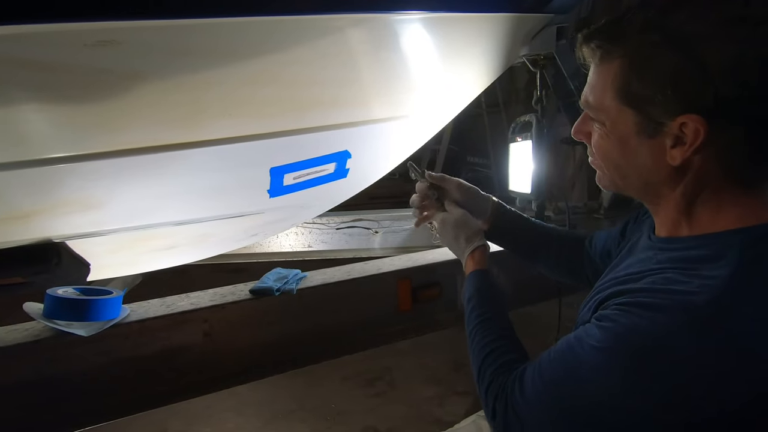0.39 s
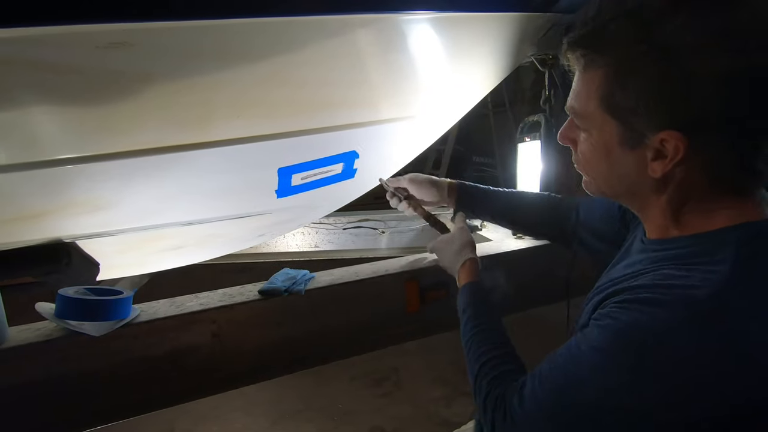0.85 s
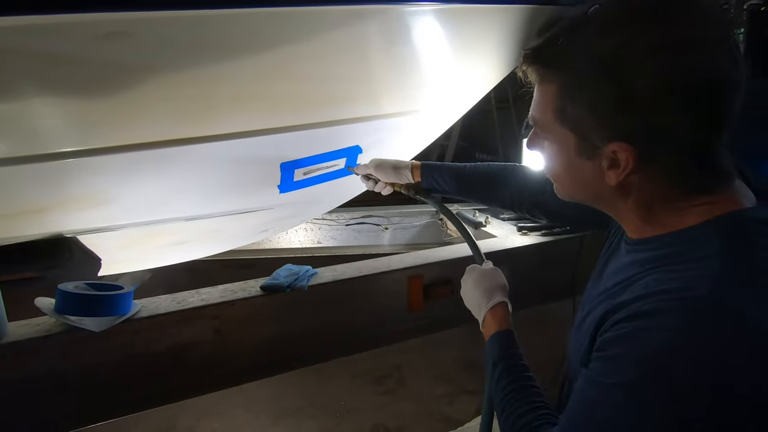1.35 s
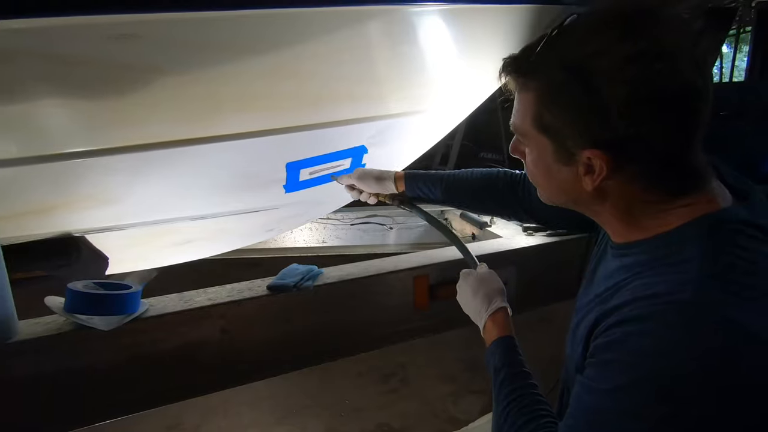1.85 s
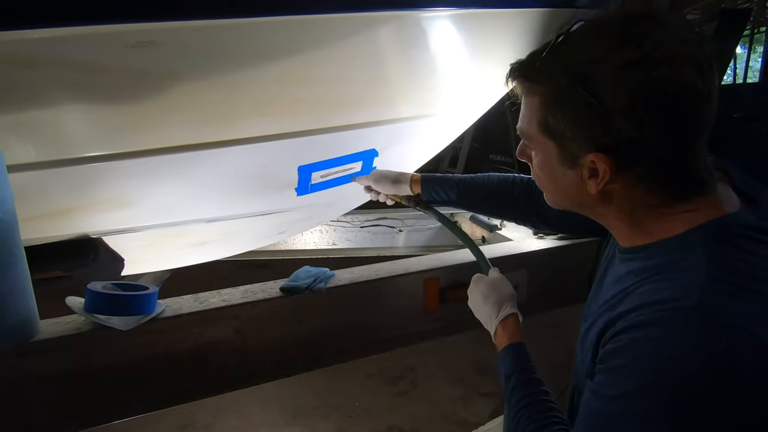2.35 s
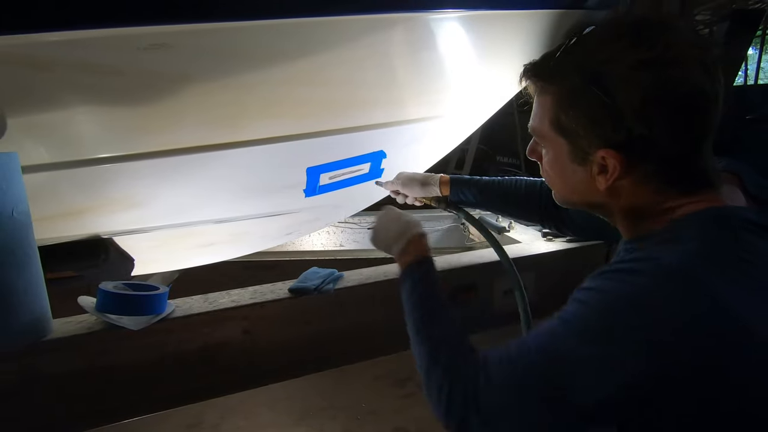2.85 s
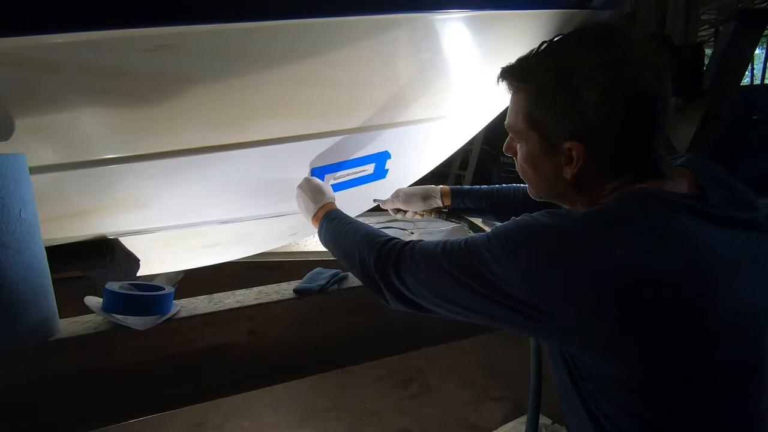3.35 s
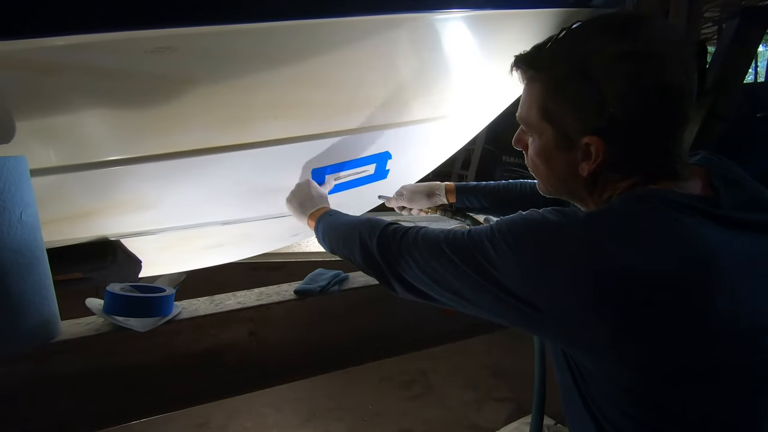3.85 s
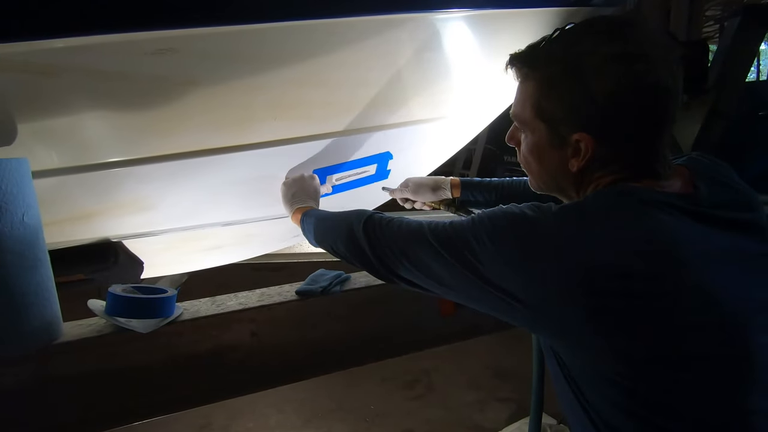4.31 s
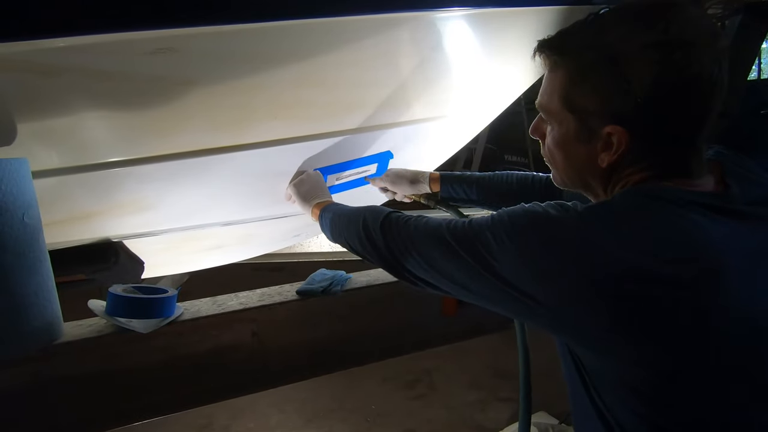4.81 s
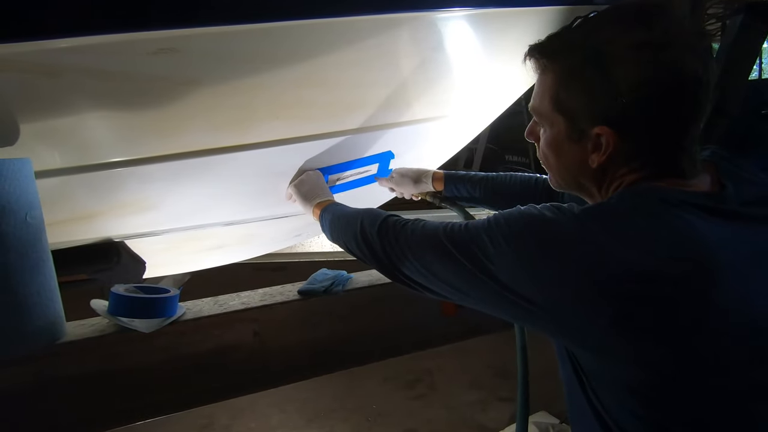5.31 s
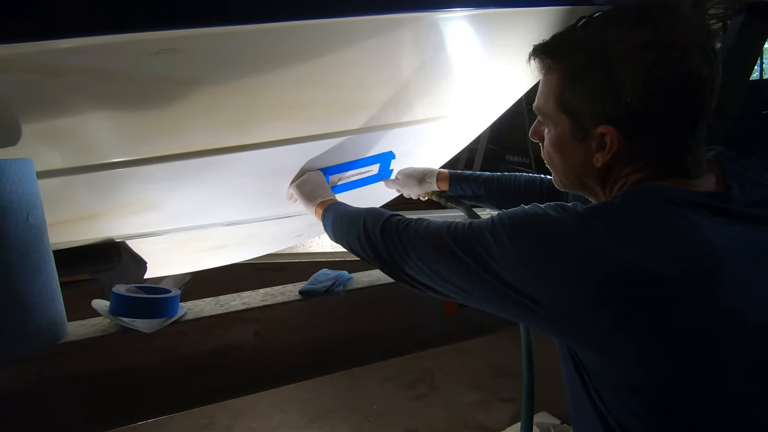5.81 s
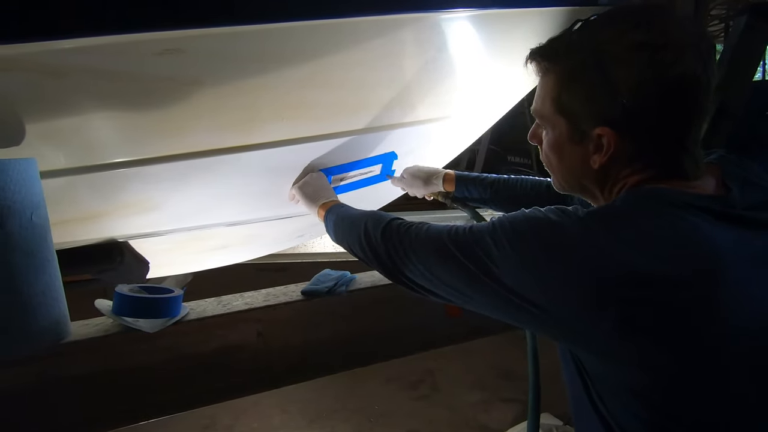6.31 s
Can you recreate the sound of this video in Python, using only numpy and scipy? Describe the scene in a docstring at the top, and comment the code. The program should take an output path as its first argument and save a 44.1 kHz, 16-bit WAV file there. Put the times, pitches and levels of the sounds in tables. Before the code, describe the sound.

A compressed-air blow gun blasts harsh hiss in short bursts, seeps thinly, then roars steadily across a boat hull with a hollow hum.

```python
"""An air blow gun in a shed, heard close by through the two ports of a small camera. The jet roars on the hand,
then the valve seeps after a faint spit, and trigger blasts sweep a taped hull patch, roaring lower at edges.
After a second stretch of seep, a long blast hums a hollow in the hull. Shaped noise makes the air, wavering
sines the hum, and single fast swings the valve thumps; a short noise tail and a gusty low wash hold the shed."""
import sys
import numpy as np
from scipy import signal
from scipy.io import wavfile
from scipy.ndimage import uniform_filter1d, map_coordinates

SR = 44100
rng = np.random.default_rng(int(sys.argv[2]) if len(sys.argv) > 2 else 0)


def file_out(sig):
    """Save sig as 16-bit WAV at sys.argv[1]."""
    # one column per channel
    cols = np.atleast_2d(sig).T
    # limit, then scale
    lim = np.clip(cols, -1, 1)
    pcm = np.round(lim * 32767).astype(np.int16)
    wavfile.write(sys.argv[1], SR, pcm)


def makeup_ratio(level_db):
    """Linear amplitude ratio for a level in decibels (20 dB per factor of ten)."""
    decades = np.asarray(level_db, float) / 20
    return 10 ** decades


N = 283253
T = np.arange(N) / SR
HZ, FRAME_S, _ = signal.stft(T, SR, nperseg=1024)

# trigger held, levels ahead of surge and sag: open_s, shut_s, hiss_db, low_roar_db, top_db
BLASTS = [(-.006, 0.028, -25, 11, -2), (.152, 0.45, -15.5, 3, -3.5), (1.185, 1.286, -12.5, -4, -1),
          (1.389, 1.491, -12.5, -3, -1), (1.56, 1.681, -14, -0.5, 0.5), (1.721, 3.044, -14.5, 0.5, 2.5),
          (4.646, 6.6, -14, -1.5, 0)]
OPEN_S, SHUT_S = 0.0085, 0.0088
# stored hose pressure rushes out first, then the supply sags
SURGE_DB, SURGE_S, SAG_DB_PER_S = 3.5, 0.018, 0.82
# air seeping past the valve: time_s, hiss_db, low_roar_db, top_db
SEEP = [(.68, -23, -2, -4.5), (.75, -31, 11, 2.5), (.88, -27.5, 5, 1.5), (1.0, -22.5, 0, 3),
        (1.17, -15.5, -10, -12), (1.3, -28, -2, 1.5), (3.15, -27, 2.5, 1.5), (3.32, -25.5, 1, 0.5),
        (3.5, -24, -1, 0.5), (4.0, -21, 5.5, 2), (4.63, -18, 6.5, 1)]
SEEP_START_S, SPIT_S = .675, .663
SEEP_UNDER_JET_DB = -4  # the open valve swallows part of the seep
# when the jet leaves the hand for the hull, and when the gun changes hands
HAND_UNTIL_S, NEW_GRIP_S = 1, 3.05
# jet colour against the hand: pitch_hz, density_db (per Hz)
JET_ON_HAND = [(120, -17), (200, -16.5), (392, -16), (479, -21.5), (923, -9), (2130, -9), (2330, -8),
               (3480, -1.5), (4840, -0.5), (9140, -1), (13600, -15), (15500, -24)]
# jet colour against the hull, before and after the new grip: pitch_hz, density_db (per Hz)
JET_ON_HULL = [
    [(120, -37), (200, -26.5), (506, -28), (858, -17.5), (1070, -16.5), (1540, -12.5), (1910, -10.5),
     (3480, 0), (4260, 0), (5300, -4.5), (8500, -6), (13900, -23), (15500, -27)],
    [(120, -47), (200, -13.5), (345, -29.5), (414, -25), (702, -19), (940, -13.5), (1130, -16.5),
     (1810, -18.5), (3610, 2), (5300, -4), (8660, -5), (13900, -23), (15500, -30)],
]
# seep colour before and after the new grip: pitch_hz, density_db (per Hz)
SEEP_COLOUR = [
    [(180, -52), (300, -25), (641, -21.5), (696, -17), (835, -14.5), (1810, -9), (2000, -9.5), (2320, -3),
     (3750, -2.5), (8990, -7), (15500, -30)],
    [(180, -57), (300, -24), (492, -27.5), (781, -21), (1400, -17.5), (1520, -13), (1730, -11.5),
     (2280, -3), (2880, -3), (3630, -2.5), (4210, -4), (8560, -11), (15500, -33.5)],
]
# the jet crosses an edge: time_s, half_length_s, roar_db, ring_hz
CROSSINGS = [(0.185, 0.051, 5, 1040), (0.39, 0.036, 1.5, 1510), (1.8, 0.022, 4, 1200),
             (1.98, 0.073, 4.5, 1500), (2.093, 0.022, 9.5, 1520), (2.258, 0.046, 10, 1570),
             (2.6, 0.056, 5, 1900), (2.776, 0.062, 7, 1480), (2.939, 0.06, 9, 1010), (4.8, 0.22, 0.5, 1700),
             (4.96, 0.053, 7.5, 940), (5.08, 0.052, 11, 950), (4.96, 0.024, 6, 1440),
             (5.117, 0.023, 5.5, 1600)]
# dB per dB of roar: level dip, lift of the top, ring; then ring width as a share of its pitch
CROSS_DIP, CROSS_TOP, CROSS_RING, RING_SHARE = 0.14, 0.18, 0.55, 0.1
# the jet squares up to the hull and the hiss swells (negative: eases): time_s, half_length_s, swell_db
SWELLS = [(1.27, .03, 1), (1.46, .03, -1.5), (1.876, .03, 7), (2.162, 0.02, 6.5), (2.373, .06, 2.5),
          (2.476, .015, 2), (5.062, 0.031, 6), (6.057, 0.078, 2.5)]
# resonances of the camera housing: pitch_hz, width_hz, lift_db
HOUSING = [(1010, 55, 0.5), (1560, 34, 6), (1760, 27, 1), (2350, 123, 5), (3500, 1030, 2.5), (4150, 200, 1),
           (4910, 19, 3.5), (5340, 100, 0.5), (6200, 66, 3.5), (8200, 410, 1), (10170, 1500, 1.5),
           (10950, 1020, -5)]
# ridges in the hiss while the nozzle holds a pose: start_s, end_s, from_hz, to_hz, width_hz, lift_db
RIDGES = [(.14, 0.446, 2950, 2820, 1210, 6.5), (0.154, .45, 6130, 5940, 200, 3.5),
          (0.655, 0.787, 3300, 3500, 400, 9), (.7, 0.857, 5900, 7300, 400, 5),
          (0.802, 1.044, 3730, 3650, 600, 7.5), (.7, .88, 2400, 2410, 300, 4),
          (0.862, 1.027, 3900, 5330, 450, 4.5), (1.055, 1.22, 2180, 2260, 250, 8),
          (1.547, 1.7, 4300, 4150, 300, 5), (2.337, 3.052, 4470, 4930, 500, 4),
          (3.103, 4.68, 1560, 1560, 121, 7.5), (3.254, 4.284, 2080, 2110, 302, 6.5),
          (3.1, 4.093, 4570, 4700, 350, 6), (3.3, 3.9, 6100, 6260, 200, 2),
          (3.102, 4.2, 7540, 7500, 1500, -2), (4.164, 4.643, 3660, 3500, 400, 5),
          (4.374, 4.657, 5900, 5930, 200, 13), (4.7, 6.5, 4300, 4760, 800, 2),
          (4.88, 5.13, 940, 940, 90, 4.5), (5.95, 6.5, 9900, 10000, 6000, 3.5)]
FLUTTER_DB = .6  # flutter of the whole jet
# tones of the hollow behind the patch: pitch_hz, waver_hz, level_db
HOLLOW = [(414, 16, 1), (598, 24, -3)]
# the jet sweeps over the mouth of the hollow: time_s, level_db
HUMS = [(.95, -44), (2.11, -44), (2.82, -41.5), (2.99, -36), (3.23, -42.5), (4.9, -41), (5.06, -38.5),
        (5.18, -34.5), (5.325, -30), (5.47, -35), (5.625, -33.5), (5.815, -32.5), (5.97, -34.5),
        (6.12, -39.5), (6.31, -39)]
HUM_RISE_S, HUM_FADE_DB_PER_S = 0.017, 164
# breathy lift of the jet's bass, in dB per dB of hum above the quiet level
HUM_PUFF_DB, HUM_PUFF_HZ, HUM_QUIET_DB = 0.72, 600, -47
# valve thumps, ahead of their decay and bass cut: time_s, level_db, swing_hz, first_swing (+1 up, -1 down)
THUMPS = [(.199, -12.5, 136, -1), (0.453, -18.5, 161, -1), (.682, -48, 160, 1), (1.285, -24.5, 210, -1),
          (1.384, -31, 109, 1), (1.487, -24.5, 207, -1), (1.561, -27, 110, 1), (1.679, -32.5, 171, -1),
          (4.654, -35, 100, 1)]
# tail of the shed
ROOM_T60_S, ROOM_DB, ROOM_DULL_HZ = 0.54, -10.5, 11200
# colour of the low air in the shed: pitch_hz, density_db (per Hz)
SHED = [(25, -4), (45, 4), (70, 2), (150, 0.5), (300, -6.5), (600, -14.5), (2000, -18), (8000, -11),
        (15000, -37)]
# gusts of stirred air: time_s, half_length_s, lift_db, deepest_part_db
GUSTS = [(.2, 0.043, 13, 5), (.3, 0.053, 12, 0), (1.29, .04, 5.5, 13), (1.68, 0.08, -8, 13),
         (2.0, .07, 1.5, 9), (2.11, 0.034, 6, 11), (2.58, 0.045, 4, 1), (2.95, .08, 5, 0),
         (3.7, 0.069, 6, 2), (3.92, 0.072, 0, 11), (4.15, .1, 3.5, -2), (4.66, .04, -0.5, 19),
         (4.74, .1, 6.5, -1), (5.1, 0.6, 6.5, -12), (5.86, .04, -1, 10), (6.39, 0.072, 10.5, -15)]
# wash at rest, its lift while the jet blows, and its deepest part
WASH_DB, WASH_LIFT_DB, DEEP_DB = -51, 3, -4
# width at the two ports: pitch_hz, side_minus_mid_db
PORT_SIDE = [(60, -12.5), (200, -15), (380, -13), (700, -8), (1290, -4), (1900, -5), (2400, -14),
             (3500, -17), (4400, -17), (5500, -3), (6800, -2.5), (8200, 0.5), (10000, -2), (15000, -1.5)]
# balance of the two ports: pitch_hz, left_minus_right_db
PORT_BALANCE = [(60, -0.5), (380, 0), (700, -1.5), (1290, -1.5), (2380, 1), (4400, .5), (6000, -0.5),
                (8120, -3), (11000, -2), (15000, 3.5)]
# part of the side a quarter turn from the mid: pitch_hz, share (signed, no unit)
PORT_LAG = [(300, -0.072), (690, -.4), (1030, .6), (1380, -0.61), (1720, .6), (2150, -.4), (2700, 0),
            (5900, .35), (8600, .45), (9700, -.2), (10500, .5), (12600, .05)]
MIC_LOW_HZ = 42


def on_hz(table):
    """A (pitch_hz, value) table read on a log pitch axis at every bin."""
    hz, value = np.transpose(table)
    return np.interp(np.log(HZ + 1), np.log(hz), value)[:, None]


def bumps(table):
    """Bell-shaped resonances over pitch, in dB."""
    return sum(db / (1 + (2 * (HZ - hz) / width) ** 2) for hz, width, db in table)[:, None]


def bells(t, s, half_s, db):
    """Sum of smooth rises and falls in time, in dB."""
    return sum(g * np.exp(-((t - at) / half) ** 2) for at, half, g in zip(s, half_s, db))


def eddies(rate, count, even=False):
    """Turbulence: random levels, rate a second, smooth over time and count patches of log or even pitch."""
    grid = rng.standard_normal((count + 2, int(N / SR * 40) + 3))
    place = HZ / HZ[-1] if even else np.log(HZ / 100 + 1) / np.log(SR / 200)
    f, t = np.meshgrid(count * place, FRAME_S * min(rate, 40), indexing="ij")
    return map_coordinates(grid, [f, t], order=1) * 1.4  # makes up for spread lost in smoothing


def hiss(db, lo_hz, hi_hz):
    """Air noise at two ports, shaped by db over pitch and time, its mid levelled between lo_hz and hi_hz."""
    mid, other = (signal.stft(rng.standard_normal(N), SR, nperseg=1024)[2] for _ in range(2))
    band = (HZ > lo_hz) & (HZ < hi_hz)
    band_power = np.sum(makeup_ratio(db[band]) ** 2, axis=0).mean() / len(HZ)
    gain = makeup_ratio(db) / np.sqrt(band_power)
    share = makeup_ratio(on_hz(PORT_SIDE))
    # the part of the side that moves with the mid makes one port louder
    balance = np.tanh(on_hz(PORT_BALANCE) * np.log(10) / 20)
    lean = np.clip(balance * (1 + share ** 2) / (2 * share), -.75, .75)
    # the part a quarter turn away comes from the gap between the ports
    lag = np.clip(on_hz(PORT_LAG), -.65, .65)
    loose = np.sqrt(1 - lean ** 2 - lag ** 2) * other
    side = share * ((lean + 1j * lag) * mid + loose)
    return np.array([signal.istft(gain * (mid + sign * side), SR, nperseg=1024)[1][:N] for sign in (1, -1)])


def trigger():
    """Valve opening, 0 to 1: it snaps open and shut."""
    ramps = [np.minimum((T - b[0]) / OPEN_S + .5, (b[1] - T) / SHUT_S + .5) for b in BLASTS]
    return np.clip(np.max(ramps, axis=0), 0, 1) ** 2


def aim(roar_db, top_db):
    """Crossing an edge lifts the low roar; turning the nozzle moves the top. In dB."""
    low = 1 / (1 + (HZ[:, None] / 2400.0) ** 6)
    high = 1 / (1 + (4800.0 / (HZ[:, None] + 1)) ** 6)
    return low * roar_db + high * top_db


def blasts(way_db):
    """The full jet: patchy turbulence that surges, sags, and changes colour at each edge."""
    opens, _, db, roar_db, top_db = np.transpose(BLASTS)
    latest = lambda t: np.maximum(np.searchsorted(opens, t + OPEN_S) - 1, 0)
    since = np.maximum(T - opens[latest(T)], 0)
    s, half_s, edge_db, _ = np.transpose(CROSSINGS)
    level_db = db[latest(T)] + SURGE_DB * np.exp(-since / SURGE_S) - SAG_DB_PER_S * since
    level_db = level_db - CROSS_DIP * bells(T, s, half_s, edge_db) + bells(T, *np.transpose(SWELLS))

    edge = bells(FRAME_S, s, half_s, edge_db)
    swell = bells(FRAME_S, *np.transpose(SWELLS))
    rings = sum(bumps([(hz, RING_SHARE * hz, CROSS_RING * g)]) * bells(FRAME_S, [at], [half], [1])
                for at, half, g, hz in CROSSINGS)
    hum_s, hum_db = np.transpose(HUMS)
    puff_db = HUM_PUFF_DB * np.maximum(hum_db - HUM_QUIET_DB, 0)
    puffs = bells(FRAME_S, hum_s + 0.0071, hum_s * 0 + 0.036, puff_db)
    rings = rings + bumps([(HUM_PUFF_HZ, 500, 1)]) * puffs

    # taking the swell back out of low and top leaves it in the core of the hiss
    low_db = roar_db[latest(FRAME_S)] + edge - 1.6 * swell
    high_db = top_db[latest(FRAME_S)] + CROSS_TOP * edge - 1.34 * swell
    turn = aim(low_db, high_db)
    on_hull = np.where(FRAME_S < NEW_GRIP_S, on_hz(JET_ON_HULL[0]), on_hz(JET_ON_HULL[1]))
    colour = np.where(FRAME_S < HAND_UNTIL_S, on_hz(JET_ON_HAND), on_hull)
    patches = 1.57 * eddies(6., count=130, even=True) + 0.84 * eddies(30., count=30)
    patches = patches + FLUTTER_DB * eddies(20., count=1)
    jet = hiss(colour + way_db + turn + rings + patches, 2100, 6340)
    return trigger() * jet * makeup_ratio(level_db)


def seep(way_db):
    """Thinner, duller hiss of the barely open valve."""
    s, db, roar_db, top_db = np.transpose(SEEP)
    colour = np.where(FRAME_S < NEW_GRIP_S, on_hz(SEEP_COLOUR[0]), on_hz(SEEP_COLOUR[1]))
    patches = 1.06 * eddies(5., count=130, even=True) + 1.0 * eddies(25., count=30)
    turn = aim(np.interp(FRAME_S, s, roar_db), np.interp(FRAME_S, s, top_db))
    # a faint spit escapes as the finger first takes up the trigger
    spit = .25 * np.exp(-((T - SPIT_S) / .003) ** 2)
    gate = np.clip((T - SEEP_START_S) / .004, 0, 1) + spit
    level_db = np.interp(T, s, db) + SEEP_UNDER_JET_DB * trigger()
    return gate * makeup_ratio(level_db) * hiss(colour + way_db + turn + patches, 1450, 10000)


def ridges():
    """Each ridge glides, and fades in and out as the nozzle turns through its pose, in dB."""
    out = 0
    for start, end, from_hz, to_hz, width, db in RIDGES:
        held = np.clip(np.minimum(FRAME_S - start, end - FRAME_S) / 0.036 + .5, 0, 1)
        hz = np.interp(FRAME_S, [start, end], [from_hz, to_hz])
        out = out + held * db / (1 + (2 * (HZ[:, None] - hz) / width) ** 2)
    return out


def hull_echo(share, lag_s, sway_s):
    """A second path off the hull combs the hiss; its lag sways as the hands move, in dB."""
    lag = lag_s + sway_s * eddies(0.73, count=1)[0]
    return 20 * np.log10(np.abs(1 + np.clip(share, 0, .9) * np.exp(2j * np.pi * HZ[:, None] * lag)))


def path():
    """What any hiss from the nozzle meets on its way in, in dB."""
    return bumps(HOUSING) + ridges() + hull_echo(share=0.14, lag_s=.0022, sway_s=.00008)


def hollow():
    """Blown like a bottle: breathy tones that speak fast at each sweep and fade as the jet moves on."""
    # averaging 400 samples shrinks the noise 20 times, so 20 brings it back
    waver = [uniform_filter1d(rng.standard_normal(N), size=400) * 20 for _ in HOLLOW]
    tones = 0
    for (hz, width, db), w in zip(HOLLOW, waver):
        tones = tones + makeup_ratio(db) * np.sin(2 * np.pi * np.cumsum(hz + width * w) / SR)
    gain = 0
    for s, db in HUMS:
        rise = np.clip((T - s) / HUM_RISE_S + 1, 0, 1) ** 2  # full at the listed time
        gain = gain + rise * makeup_ratio(db - HUM_FADE_DB_PER_S * np.maximum(T - s, 0))
    return gain * tones * makeup_ratio([[-1.5], [1.5]])  # leans to the second port


def thumps():
    """One quick, slowing pressure swing as the valve seats or lifts; the microphone drops its slowest part."""
    out = np.zeros(N)
    for s, db, hz, way in THUMPS:
        turns = np.maximum(T - s, 0) * hz
        swing = np.sin(2 * np.pi * turns ** 0.67) * np.exp(-(turns / 0.99) ** 3.4)
        out += np.sign(way) * makeup_ratio(db) * swing
    return signal.lfilter(*signal.butter(1, 40., "high", fs=SR), out)


def room(x):
    """Shed reflections as a dense fading noise tail, unrelated at the two ports."""
    t = np.arange(SR) / SR
    tail = rng.standard_normal((2, SR)) * makeup_ratio(-60 * t / ROOM_T60_S) * (t > .008)
    tail = signal.lfilter(*signal.butter(1, ROOM_DULL_HZ, fs=SR), tail)
    tail = tail / np.sqrt(np.sum(tail ** 2, axis=1, keepdims=True))
    return makeup_ratio(ROOM_DB) * signal.fftconvolve(x.mean(axis=0)[None], tail, axes=1)[:, :N]


def wash():
    """Gusty low air and the shed's background; the deepest part buffets on its own."""
    s, half_s, db, deep_db = np.transpose(GUSTS)
    buffet_db = DEEP_DB + 4.9 * eddies(8.9, count=1)[0] + bells(FRAME_S, s, half_s, deep_db)
    deep = buffet_db / (1 + (HZ[:, None] / 94.0) ** 4)
    level_db = WASH_DB + WASH_LIFT_DB * uniform_filter1d(trigger(), size=2000) + bells(T, s, half_s, db)
    return makeup_ratio(level_db) * hiss(on_hz(SHED) + deep + 1.6 * eddies(20., count=6), 100, 230)


def scene():
    """Gun, its ring in the shed, thumps and wash."""
    way_db = path()
    gun = blasts(way_db) + seep(way_db) + hollow()
    return gun + room(gun) + thumps() + wash()


def band_limit(x):
    """A steep low-pass at the top of the band."""
    return signal.sosfilt(signal.butter(12, 15710, fs=SR, output="sos"), x)


def record(dry):
    """The microphone loses the deepest bass and clips at full scale."""
    trimmed = signal.lfilter(*signal.butter(1, MIC_LOW_HZ, "high", fs=SR), dry)
    mix = np.clip(trimmed, -1, 1)
    return band_limit(mix)


dry = scene()
out = record(dry)
file_out(out)
```